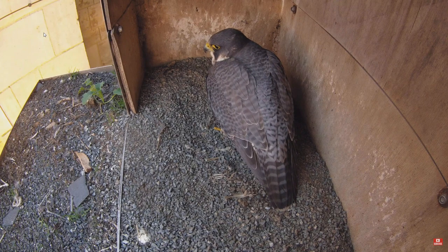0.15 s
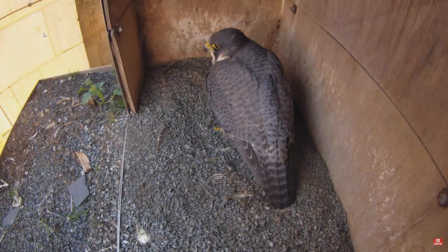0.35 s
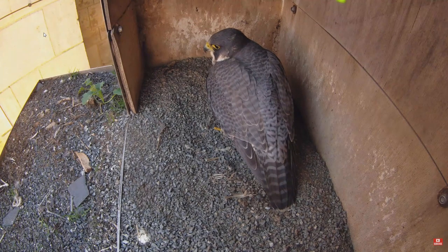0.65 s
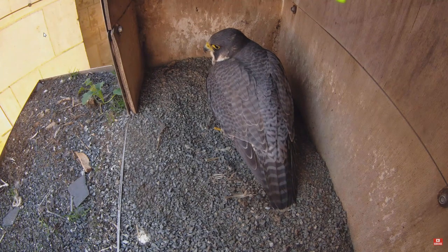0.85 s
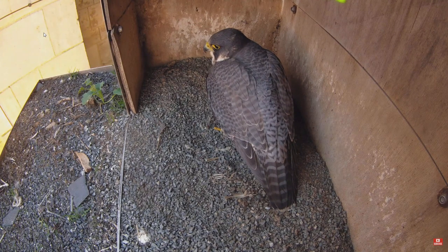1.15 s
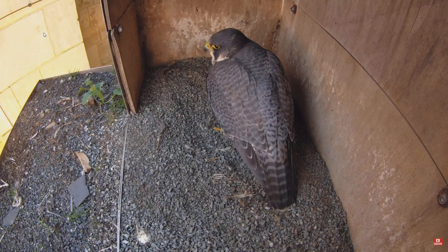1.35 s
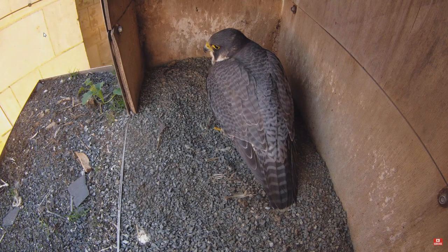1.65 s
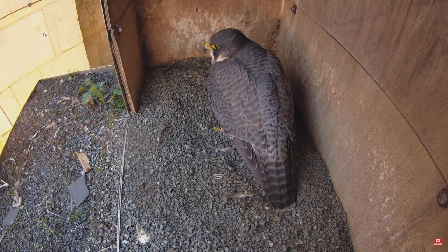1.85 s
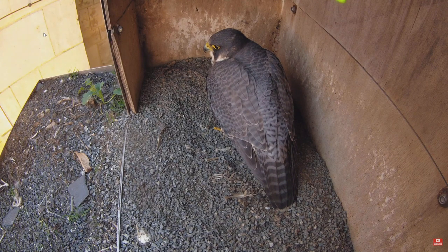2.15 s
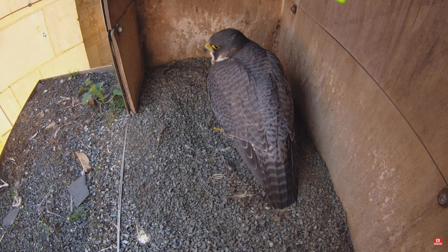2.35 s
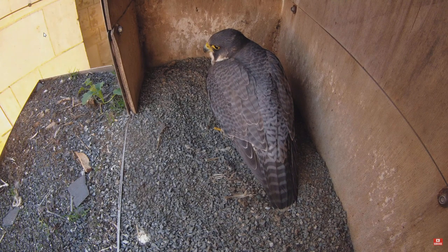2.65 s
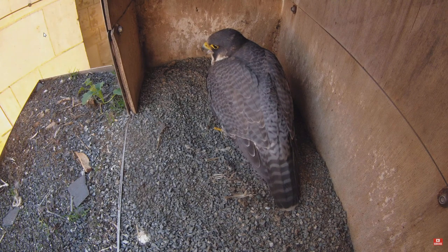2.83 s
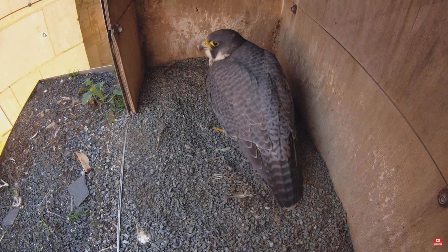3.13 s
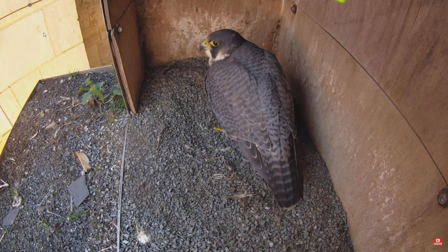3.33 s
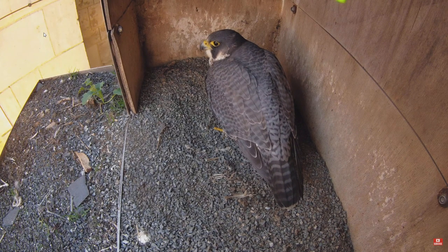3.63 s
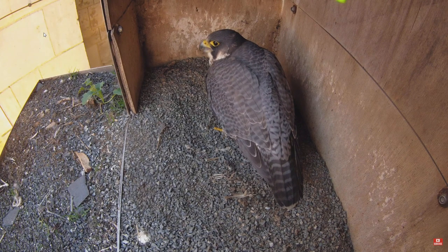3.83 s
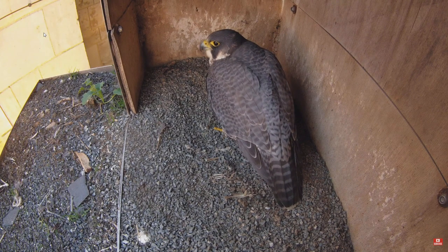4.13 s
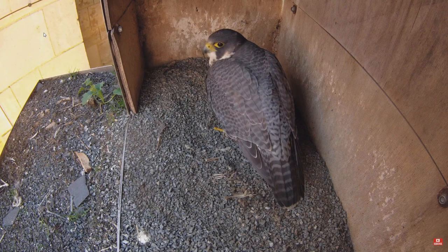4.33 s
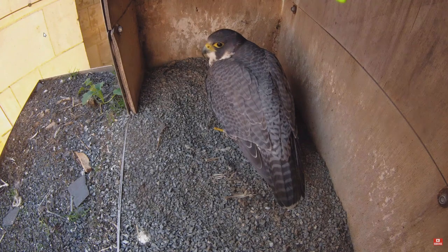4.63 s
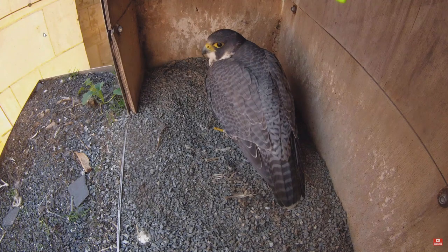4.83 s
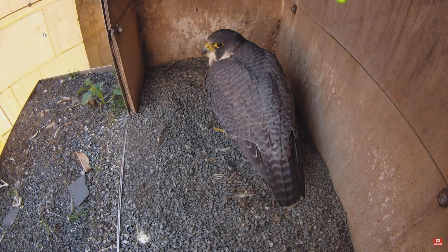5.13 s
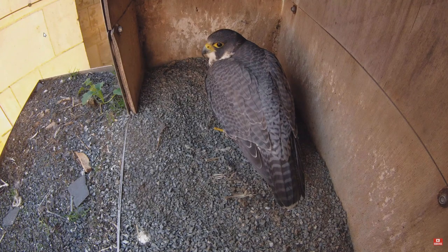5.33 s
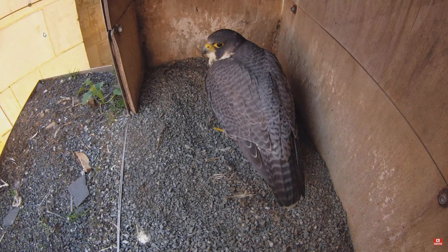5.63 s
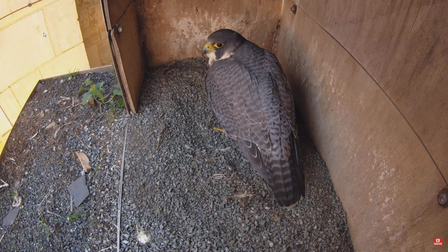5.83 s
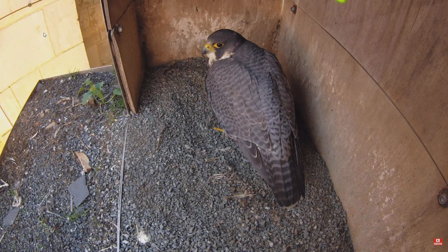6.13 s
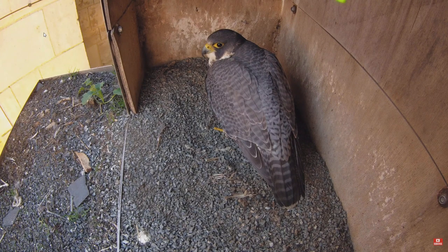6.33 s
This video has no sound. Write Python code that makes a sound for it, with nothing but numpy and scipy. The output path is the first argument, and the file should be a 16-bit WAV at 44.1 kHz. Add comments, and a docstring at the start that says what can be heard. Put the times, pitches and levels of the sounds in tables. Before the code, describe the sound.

Low outdoor traffic murmur surrounds a falcon calling at close range. A quick rough chirp comes first, then a trembling, rising wail in two sections with a far engine humming behind it. Next come loud, abrasive squawks and calls that squeeze up into a thin whistle and snap down into a hoarse chup. Short woody reflections colour every cry, the peaks are overdriven, and tiny distant peeps appear between later calls.

```python
"""A peregrine falcon in a wooden nest box, close to a small camera microphone, over an outdoor murmur.
One chirp, then a wavering hoarse wail in two parts while a distant engine swells; from 2.3 s a run of
harsh "ee-chup" calls leaps between rasp and whistle, with faint far birds among the later ones.
Voice: a rough harmonic buzz through three windpipe resonances, plus filtered noise for throat air.
The box adds short reflections and a tail; the microphone limits and clips the loudest notes."""
import sys
import numpy as np
from scipy import signal
from scipy.fft import rfft, irfft, next_fast_len
from scipy.io import wavfile
from scipy.ndimage import uniform_filter1d, minimum_filter1d

SR = 44100
rng = np.random.default_rng(int(sys.argv[2]) if len(sys.argv) > 2 else 0)


def output_pcm(signal):
    """Save a mono or channel-first signal as 16-bit PCM at the path in sys.argv[1].

    Samples are clipped to [-1, 1] before scaling.
    """
    pcm = np.clip(np.atleast_2d(signal).T, -1, 1) * 32767
    wavfile.write(sys.argv[1], SR, np.round(pcm).astype(np.int16))


N = 285768
TIME = np.arange(N) / SR


def gain_of(db):
    """Decibels to amplitude."""
    return 10 ** (np.asarray(db) / 20)


def evened(x):
    """Scales to rms 1."""
    return x / np.sqrt(np.mean(x ** 2) + 1e-20)


def read(points, hz):
    """Interpolates a (f/Hz, value) table on a logarithmic frequency axis."""
    f, value = np.transpose(points)
    return np.interp(np.log(hz + 1), np.log(f + 1), value)


def follow(rows, t):
    """Interpolates every column of a (t/s, ...) table at the times t."""
    s, *columns = np.transpose(rows)
    s = np.maximum.accumulate(s)
    return [np.interp(t, s, column) for column in columns]


def colour(x, shape):
    """Zero-phase filter with the response of a (f/Hz, gain/dB) table."""
    size = next_fast_len(len(x) + 2048)
    response = gain_of(read(shape, np.fft.rfftfreq(size, 1 / SR)))
    return irfft(rfft(x, size) * response, size)[:len(x)]


def wander(count, hz):
    """Low-passed noise of rms 1: random motion no faster than about hz."""
    lowpass = signal.butter(2, hz, fs=SR, output="sos")
    return evened(signal.sosfilt(lowpass, rng.standard_normal(count)))


def smooth(x, size):
    """Triangular running mean."""
    return uniform_filter1d(uniform_filter1d(x, size), size)


def clock(length_s):
    """Seconds since the start of a note."""
    return TIME[:round(length_s * SR)]


def placed(start_s, sound):
    """Puts a sound at its moment in N samples of silence."""
    first = round(start_s * SR)
    return np.pad(sound, (first, N - first - len(sound)))


def envelope_db(t, attack_s, release_at_s, fall_db_per_s, onset_db=-28):
    """Attack, hold and release, in dB relative to full level."""
    attack_db = onset_db * np.maximum(1 - t / attack_s, 0)
    return attack_db - fall_db_per_s * np.maximum(t - release_at_s, 0)


def outdoors(murmur_db=-58, engine_db=-1, throb=0.34, fourth_db=-19):
    """Far traffic: filtered-noise rumble, a swelling roar band, and an engine of two unsteady partials."""
    # murmur spectrum: f/Hz, relative density/dB
    murmur_shape = [(15, -38.5), (25, -4), (70, -6.5), (107, 0), (140, -25.5), (253, -11.5), (457, -26.5),
                    (695, -5.5), (981, -21.5), (1320, -14.5), (2200, -30), (3500, -35.5), (8000, -39),
                    (11700, -80.5)]
    # roar swell before the band filter: t/s, swell/dB
    murmur_swell = [(0, -1), (.8, -1), (2, 0), (2.9, 2), (3.5, 0), (4.1, 2), (4.75, 3), (5.1, 2.5),
                    (5.65, -0.5), (6.45, -1)]
    # engine before engine_db trim: t/s, mean f/Hz, level/dB
    engine_curve = [(.9, 90.03, -73), (1.2, 90.4, -62), (1.4, 96.35, -38.5), (1.6, 102.6, -45.5),
                    (1.74, 106.4, -39), (2.03, 104.5, -49.5), (2.15, 113.4, -62.5), (2.9, 108.4, -64),
                    (3.17, 107, -48.5), (3.4, 103.7, -68)]
    murmur = gain_of(murmur_db) * evened(colour(rng.standard_normal(N), murmur_shape))
    roar = colour(murmur, [(200, -32), (550, 14.5), (6000, -7.5)])
    swell_db, = follow(murmur_swell, TIME)
    hz, level_db = follow(engine_curve, TIME)
    phase = 2 * np.pi * np.cumsum(hz * (1 + 0.024 * wander(N, 28))) / SR
    partials = np.sin(phase) + gain_of(fourth_db) * np.sin(4 * phase)
    engine = gain_of(level_db + engine_db) * evened(partials * (1 + throb * wander(N, 35)))
    engine_fade = np.interp(TIME, [.7, .9, 3.4, 3.6], [0, 1, 1, 0])
    return murmur + (gain_of(swell_db) - 1) * roar + engine * engine_fade


def far_birds():
    """Faint peeps: gliding, slightly unsteady sines under a Hann window."""
    # t/s, length/s, start f/Hz, end f/Hz, level/dB
    peeps = [(0.591, 0.1, 3850, 3700, -72), (4.026, 0.075, 3990, 3890, -61.5),
             (4.043, 0.074, 5110, 4920, -65), (4.703, 0.072, 4160, 3850, -57.5),
             (4.79, 0.2, 3320, 3500, -51.5), (5.066, 0.096, 3010, 3280, -63.5),
             (5.56, 0.076, 3340, 3280, -62.5), (5.767, 0.089, 4130, 4130, -71.5)]
    out = np.zeros(N)
    for start_s, length_s, start_hz, end_hz, level_db in peeps:
        count = round(length_s * SR)
        hz = np.linspace(start_hz, end_hz, count) * (1 + 0.007 * wander(count, 100))
        phase = 2 * np.pi * np.cumsum(hz) / SR
        out[round(start_s * SR):][:count] += gain_of(level_db) * np.hanning(count) * np.sin(phase)
    return out


def box(x, wet_db=-8.0):
    """Convolves with near-wall reflections, a short sparse-tap tail, and the box's standing waves."""
    # tail decay: f/Hz, t60/s
    box_decay = [(250, 0.29), (700, 0.16), (1800, 0.13), (4500, 0.14), (8000, 0.13)]
    # standing waves: f/Hz, t60/s, gain
    box_modes = [(1713, 0.042, 0.00055), (2403, 0.25, 0.00027)]
    # wall reflections: delay/s, gain
    walls = [(.0013, -0.0047), (.0029, 0.017), (.0047, 0.49), (.0074, -0.21)]
    count = SR // 3
    t = TIME[:count]
    taps = rng.choice([-1., 1.], count) * (rng.random(count) < .15) * (t > .004)
    hz, frame_s, spectrum = signal.stft(taps, SR, nperseg=256)
    decay = gain_of(-60 * frame_s / read(box_decay, hz)[:, None])
    tail = signal.istft(spectrum * decay, SR, nperseg=256)[1][:count]
    echo = gain_of(wet_db) * tail / np.linalg.norm(tail)
    for mode_hz, t60_s, gain in box_modes:
        echo += gain * np.cos(2 * np.pi * mode_hz * t) * gain_of(-60 * t / t60_s)
    for delay_s, gain in walls:
        echo[round(delay_s * SR)] += gain
    return x + signal.fftconvolve(x, echo)[:N]


def throat_rings(hz=1660, t60_s=0.11):
    """A low throat resonance left ringing after the harshest notes: decaying sines."""
    # t/s, level/dB
    rings = [(0.159, -17), (2.787, -16), (3.905, -13.5)]
    out = np.zeros(N)
    for start_s, level_db in rings:
        age = np.maximum(TIME - start_s, 0)
        attack = np.minimum(age / 0.001, 1)
        out += gain_of(level_db - 60 * age / t60_s) * attack * np.sin(2 * np.pi * hz * age)
    return out


def air(start_s, shape, level_db):
    """Turbulent air in the throat: filtered noise at a given level curve."""
    count = len(level_db)
    noise = evened(colour(rng.standard_normal(count), shape))
    return placed(start_s, gain_of(level_db) * signal.windows.tukey(count, 600 / count) * noise)


def syrinx(hz, rough, doubling, jitter=.047, jitter_hz=420, flutter=.9, flutter_hz=110,
           shimmer=0.041, shimmer_hz=300, rasp=1.1, rasp_power=2.1, hiss=.008,
           doubling_gain=0.8, side_loss=0.45, third_boost=0.97):
    """Unsteady membranes and puffs of turbulent air; returns the whole buzz and its bare fundamental."""
    patchy_db, patchy_hz = 6, 25
    count = len(hz)
    phase = 2 * np.pi * np.cumsum(hz * (1 + jitter * rough * wander(count, jitter_hz))) / SR
    # wailing register: third partial leads, upper neighbours weak
    wailing = np.interp(hz, [1080, 1150, 1420, 1500], [0, 1, 1, 0])
    buzz = np.zeros(count)
    for k in np.arange(1, min(29, 2 * SR / 5 / hz.min())) / 2:
        # alternate strong and weak cycles: lines halfway between the harmonics
        weight = doubling_gain * np.clip(doubling, 0, 1) if k % 1 else 1
        if k in (4, 5, 7):
            weight = 1 - side_loss * wailing
        if k == 3:
            weight = 1 + third_boost * wailing
        # roughness: each partial flutters and fades on its own
        torn = 1 + flutter * np.sqrt(rough) * wander(count, flutter_hz)
        torn = torn * gain_of(patchy_db * np.sqrt(rough) * wander(count, patchy_hz))
        top_fade = np.clip((SR / 5 - k * hz) / 700, 0, 1)
        # k * k: windpipe delays each partial differently
        buzz += weight * torn * np.cos(k * phase + k * k) * top_fade
    buzz /= np.sqrt(abs(smooth(buzz ** 2, size=900)) + 1e-6)
    buzz *= 1 + shimmer * np.sqrt(rough) * wander(count, shimmer_hz)
    puffs = evened((1 + 1.1 * np.cos(phase)) * rng.standard_normal(count))
    fundamental = np.cos(phase + 1) * gain_of(patchy_db * np.sqrt(rough) * wander(count, patchy_hz))
    return (1 - rough) * buzz + (hiss + rasp * rough ** rasp_power) * puffs, fundamental


def voice(start_s, hz, rough, doubling, levels_db, breast_db=0):
    """Three windpipe resonances share out the buzz; the fundamental also sounds through the breast."""
    # low, middle, high resonance, each: f/Hz, gain/dB
    windpipe = [
        [(130, -37), (330, -28), (550, -15.5), (900, -19), (1300, -13), (1750, -5.5), (2450, 0.5), (3000, -1.5),
         (3450, -9.5), (3850, -40.5), (4200, -79)],
        [(2200, -69), (2900, -21.5), (3400, -3), (4050, 3.5), (4700, -4), (5300, -12), (5900, -32.5),
         (6500, -74)],
        [(4400, -71.5), (5150, -6.5), (5650, -3.5), (6300, -2), (7050, -0.5), (7600, -10.5), (8450, -17),
         (8800, -20.5), (9500, -55.5), (11000, -68.5)],
    ]
    # f/Hz, gain/dB
    breast = [(230, 1), (340, -19.5), (560, -27.5), (720, -25.5), (850, -19),
              (1050, -19.0), (1250, -17.5), (1400, -24.5), (1600, -79.0)]
    t = TIME[:len(hz)]
    drive, fundamental = syrinx(hz, np.clip(rough, 0, .95), doubling)
    drive = drive * signal.windows.tukey(len(t), 200 / len(t))
    sound = gain_of(levels_db[0] + breast_db + read(breast, hz)) * fundamental
    for shape, level_db in zip(windpipe, levels_db):
        ring = colour(drive, shape)
        # levelled, so level_db alone sets the strength
        sound += gain_of(level_db) * ring / np.sqrt(abs(smooth(ring ** 2, size=300)) + 1e-9)
    fade = np.clip(np.minimum(t, t[-1] - t) / 0.0068, 0, 1)
    return placed(start_s, sound * fade)


def squawk(curve, mid_db, high_db):
    """A long bending cry that slips between clear, doubled and rough."""
    start_s = curve[0][0]
    hz, rough, doubling, level_db = follow(curve, start_s + clock(curve[-1][0] - start_s))
    return voice(start_s, hz, rough, doubling, (level_db, level_db + mid_db, level_db + high_db))


def crack(start_s, length_s, hold_s, rough, low_db, mid_db, high_db, breast_db,
          start_hz=991, end_hz=200, collapse_s=.0085, end_rough=.35, doubling=0.05):
    """A harsh burst; then the pressure drops and the pitch collapses into a short grunt."""
    t = clock(length_s)
    tension = np.exp(-np.maximum(t - hold_s, 0) / collapse_s)
    hz = end_hz + (start_hz - end_hz) * tension
    body_db = envelope_db(t, .004, hold_s, 870, onset_db=-6.5)
    edge_db = envelope_db(t, .003, hold_s, 1000, onset_db=-3)
    return voice(start_s, hz, end_rough + (rough - end_rough) * tension, doubling,
                 (low_db + body_db, mid_db + edge_db, high_db + edge_db), breast_db)


def wail(start_s, length_s, pitch_hz, crest_s, period_s, droop_hz, level_db, crescendo_db,
         low_db, high_db, breast_db, warble_hz=47.3, base_rough=0.3, warble_rough=0.19, droop_s=0.18,
         low_opening_db=11, high_opening_db=8, crest_dip_db=-1.0, crest_thinning_db=-4,
         waver_hz=11, waver_rate_hz=30, ragged_db=2.0, air_db=-2, breast_patchy_db=3):
    """A warbling crescendo, rougher and thinner on each crest; it fills out and droops towards the end."""
    # throat air: f/Hz, relative level/dB
    wail_air = [(800, -53), (1900, -30), (2250, -8), (2450, 10), (2650, -7.5), (3000, -23), (5000, -55)]
    # briefly pure and full: t/s, half length/s, low resonance lift/dB
    clear_s, clear_half_s, clear_db = (1.3, 0.028, 6.5)
    t = clock(length_s)
    progress = t / length_s
    warble = np.cos(2 * np.pi * (start_s + t - crest_s) / period_s)
    ending = np.clip(1 - (length_s - t) / droop_s, 0, 1)
    hz = pitch_hz + warble_hz * warble - droop_hz * ending + waver_hz * wander(len(t), waver_rate_hz)
    middle_db = level_db + crescendo_db * progress + crest_dip_db * warble
    middle_db = middle_db + envelope_db(t, 0.011, length_s - .028, 600, onset_db=-16)
    sides_db = middle_db + crest_thinning_db * warble * (1 - ending)
    low_curve_db = sides_db + low_db + low_opening_db * progress ** 2
    high_curve_db = sides_db + high_db + high_opening_db * progress ** 2
    clear = np.exp(-((start_s + t - clear_s) / clear_half_s) ** 2)
    rough = (base_rough + warble_rough * warble) * (1 - 1.43 * clear)
    bands_db = (low_curve_db + clear_db * clear, middle_db, high_curve_db)
    levels_db = [band_db + ragged_db * wander(len(t), 70) for band_db in bands_db]
    patchy_breast_db = breast_db + breast_patchy_db * wander(len(t), 12)
    tone = voice(start_s, hz, rough, .015, levels_db, patchy_breast_db)
    return tone + air(start_s, wail_air, low_curve_db + air_db)


def chack(start_s, length_s, top_hz, rough, low_db, mid_db, high_db,
          scoop_hz=260, scoop_s=.013, onset_rough=0.63, doubling=.06):
    """A low buzz scoops up to its pitch and clears; its body fades before the treble does."""
    t = clock(length_s)
    below = np.exp(-t / scoop_s)
    body_db = envelope_db(t, 0.011, 0.032, 380)
    edge_db = envelope_db(t, 0.016, .05, 200)
    return voice(start_s, top_hz - scoop_hz * below, rough + onset_rough * (below - .5), doubling,
                 (low_db + body_db, mid_db + body_db, high_db + edge_db), breast_db=4)


def squeal(start_s, length_s, start_hz, end_hz, rough, doubling, *levels_db):
    """A hoarse straight glide with a firm onset, soon tailing off."""
    t = clock(length_s)
    shape_db = envelope_db(t, 0.017, 0.012, 220, onset_db=-10.5)
    return voice(start_s, np.linspace(start_hz, end_hz, len(t)), rough, doubling,
                 [db + shape_db for db in levels_db])


def whistle(start_s, length_s, start_hz, end_hz, rough, mid_db, high_db,
            sag_hz=30, doubling=0.066, rasp_db=-3, low_db=-40):
    """A slightly sagging glide; the rougher it is, the more the air rasps around it."""
    # throat air: f/Hz, relative level/dB
    whistle_air = [(300, -25.5), (1900, -19), (2650, 1.5), (3300, -17.5), (5000, -14), (6000, -6),
                   (7000, 0), (7800, -16.5), (9500, -48.5)]
    t = clock(length_s)
    hz = np.linspace(start_hz, end_hz, len(t)) - sag_hz * np.sin(np.pi * t / length_s)
    shape_db = envelope_db(t, 0.023, length_s - .018, 450, onset_db=-8)
    levels_db = [db + shape_db for db in (mid_db + low_db, mid_db, high_db)]
    tone = voice(start_s, hz, rough, doubling, levels_db)
    return tone + rough * air(start_s, whistle_air, mid_db + rasp_db + shape_db)


def thin_whistle(start_s, length_s, start_hz, end_hz, rough, high_db, low_db=-46, mid_db=-38):
    """A nearly pure glide, almost all in the high resonance; low and mid are relative to it."""
    t = clock(length_s)
    level_db = high_db + envelope_db(t, 0.0063, length_s, 0, onset_db=-11)
    return voice(start_s, np.linspace(start_hz, end_hz, len(t)), rough, 0,
                 (level_db + low_db, level_db + mid_db, level_db))


def chup(start_s, pitch_hz, rough, low_db, mid_db, high_db, length_s=.075, pitch_at_s=.016,
         opening_ratio=1.61, sag_hz_per_s=2800, whistle_rough=0.2, whistle_drop_hz=350,
         whistle_db=-1, bark_mid_db=-5, doubling=0.21):
    """One side of the syrinx drops into a short whistle; the other barks hoarsely in a lower register."""
    t = clock(length_s)
    whistle_hz = pitch_hz * opening_ratio + whistle_drop_hz * np.exp(-t / .009)
    level_db = mid_db + whistle_db + envelope_db(t, 0.0071, 0.017, 780, onset_db=-9.5)
    opening = voice(start_s, whistle_hz, whistle_rough, 0, (level_db - 23.5, level_db, level_db - 23))
    bark_hz = pitch_hz - sag_hz_per_s * (t - pitch_at_s)
    levels_db = (low_db + envelope_db(t, .021, 0.041, 1100),
                 mid_db + bark_mid_db + envelope_db(t, .018, 0.036, 760),
                 high_db + envelope_db(t, 0.014, .023, 640))
    return opening + voice(start_s, bark_hz, rough, doubling, levels_db)


def falcon():
    """Every note of the bird, and the ring of its throat."""
    # An "ee-chup" runs chack, squeal, whistle, thin whistle, chup; most calls skip some.
    # low, middle, high: levels in the three windpipe resonances, before each note's envelope.
    # low rough openings: t/s, length/s, final f/Hz, roughness 0-1, low/dB, middle/dB, high/dB
    chacks = [(2.951, 0.033, 700, 0.67, -16, -19.5, -28.5), (4.168, 0.077, 742, 0.71, -13, -15.5, -19.5),
              (4.873, .058, 700.6, 0.4, -10.5, -16.5, -19.5), (5.23, 0.029, 651, 0.7, -27.5, -33, -34),
              (5.845, 0.056, 774.6, 0.52, -11.5, -17.5, -22)]
    # hoarse glides: t/s, length/s, start f/Hz, end f/Hz, roughness 0-1, period doubling 0-1,
    # low/dB, middle/dB, high/dB
    squeals = [(1.033, 0.042, 2129, 2310, 0.09, 0.11, -34, -34, -51),
               (2.707, 0.02, 1242, 1303, 0.13, 0.27, -10, 2, -19.5),
               (2.976, 0.034, 1214, 1235, 0.44, 0.2, -13, -16.5, -19),
               (2.999, .042, 3012, 2830, 0.2, 0.06, -14.5, -20.5, -10.5),
               (3.031, 0.053, 2825, 2666, 0.2, 0.3, -34, -17, -33),
               (3.722, 0.041, 1800, 1780, 0.5, .3, -30, -17, -11.5),
               (4.92, 0.0372, 2000, 1920, 0.37, 0.39, -48, -16.5, -26),
               (5.886, 0.061, 2986, 2467, 0.42, 0.23, -21.5, -20.5, -23.5)]
    # the "ee": t/s, length/s, start f/Hz, end f/Hz, roughness 0-1, middle/dB, high/dB
    whistles = [(1.068, 0.075, 3554, 3622, 0.04, -28.5, -43), (2.393, 0.046, 5364, 5234, .07, -14, -16),
                (3.103, 0.067, 4514, 4730, .14, -13, -37.5), (4.225, 0.065, 4637, 4216, .09, -4.5, -35),
                (4.283, .082, 4348, 4666, 0.15, -11.5, -26), (5.249, .088, 4061, 4232, 0.07, -6, -28.5),
                (5.983, .102, 4144, 4730, 0.11, -9, -46)]
    # top register: t/s, length/s, start f/Hz, end f/Hz, roughness 0-1, high/dB
    thin_whistles = [(2.324, 0.038, 5420, 5960, 0.02, -21.5), (2.366, 0.02, 6880, 6630, .08, -20),
                     (3.179, 0.067, 6955, 6956, 0.08, -18), (4.358, 0.13, 6650, 7070, 0.1, -13),
                     (6.072, 0.057, 6830, 6650, 0.15, -22)]
    # closing barks: t/s, bark f/Hz (16 ms in), roughness 0-1, low/dB, middle/dB (before trims), high/dB
    chups = [(2.419, 2468, 0.47, -8, -9, -13), (3.237, 2516, 0.49, -1.5, 0, -6),
             (4.441, 2414, 0.6, -8.5, -2, -6.5), (5.327, 2283, 0.64, -13.5, -7.5, -11),
             (6.113, 2405, 0.62, -13, -5.5, -10)]
    # t/s, length/s, centre f/Hz, first warble crest t/s, warble period/s, final droop/Hz,
    # starting level/dB, crescendo/dB, starting low and high re level/dB, breast re low/dB
    wails = [(1.136, 0.6945, 1268, 1.163, .111, 77.8, -35, 17.5, -19, -17.5, -19),
             (1.91, 0.431, 1287, 1.947, .133, 34.77, -20, 7.5, -16, -16, 4)]
    # a squawk breaks and its pitch collapses: t/s, length/s, time at full force/s, roughness 0-1,
    # low/dB, middle/dB, high/dB, breast re low/dB
    cracks = [(0.146, 0.043, 0.0051, 0.9, -23, -31.5, -32, 4.5),
              (2.721, 0.072, 0.039, 1, -0.5, -7.5, -12.5, 0.5),
              (3.865, 0.063, 0.02, .5, 0, -5.5, -11.5, -4.5)]
    # one curve per squawk: t/s, f/Hz, roughness 0-1, period doubling 0-1, low/dB
    squawks = [
        [(.064, 1733, 0, 0, -47), (.074, 1680, 0.2, 0.2, -20.5), (.088, 1863, .16, 0.3, -18),
         (.105, 2033, 0, 0.09, -14), (.121, 2097, .02, 0.2, -24), (.134, 2062, 0, .3, -21),
         (.143, 1874, 0, 0.29, -7), (.16, 1664, .25, .5, -17.5)],
        [(2.566, 2370, .05, 0.4, -36.5), (2.579, 2257, .25, .7, -10.5), (2.603, 2059, 0, .05, -4),
         (2.621, 1876, 0, .15, -9), (2.636, 1785, 0.5, .4, -23), (2.66, 1688, 0.1, 0.8, -17.5),
         (2.674, 1703, 0.1, 0.9, -17.5), (2.698, 1778, 0.07, 1, -10.5), (2.714, 1790, .1, 1, -26.5)],
        [(3.644, 1787, 0, .5, -38.5), (3.658, 1969, 0.8, 0.9, -10), (3.679, 1969, 0, 0.6, -9),
         (3.70, 1805, 0.81, 0.7, -12), (3.724, 1599, 0.7, 0.1, -16), (3.756, 1617, 0.5, .7, -18),
         (3.78, 1589, .06, .8, -20), (3.835, 1680, 0, 1, -15.5), (3.862, 1870, .1, 1, -17.5)],
    ]
    # one row per squawk: middle re low/dB, high re low/dB
    squawk_colours = [(-6, -19.5), (1.5, -11), (-1, -13.5)]
    kinds = [(chack, chacks), (squeal, squeals), (whistle, whistles), (thin_whistle, thin_whistles),
             (chup, chups), (wail, wails), (crack, cracks)]
    notes = sum(note(*row) for note, rows in kinds for row in rows)
    cries = sum(squawk(curve, *colours) for curve, colours in zip(squawks, squawk_colours))
    return notes + cries + throat_rings()


def scene():
    """The falcon in its box, with the outdoors behind it."""
    return (gain_of(-2.5) * box(falcon()) + outdoors() + far_birds())[None]


def record(dry):
    """Microphone: fast limiter just under the ceiling, uneven clipping, treble cut, band limit."""
    limit, top, bottom, edge_hz = .66, .69, -.76, 16000
    envelope = smooth(abs(signal.hilbert(dry[0])), size=24)
    reduction = minimum_filter1d(np.minimum(1, limit / (envelope + 1e-9)), size=20)
    held = dry[0] * smooth(reduction, size=30)
    clipped = colour(np.clip(held, bottom, top), [(8400, -0.5), (9500, -9), (16000, -9.0)])
    lowpass = signal.firwin(511, edge_hz, window=("kaiser", 9), fs=SR)
    return signal.oaconvolve(clipped, lowpass, "same")[None]


dry = scene()
out = record(dry)
output_pcm(out)
```